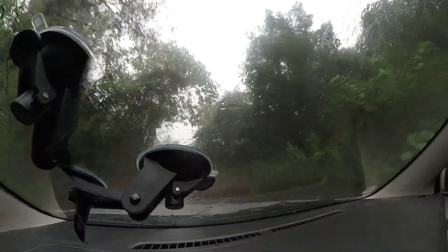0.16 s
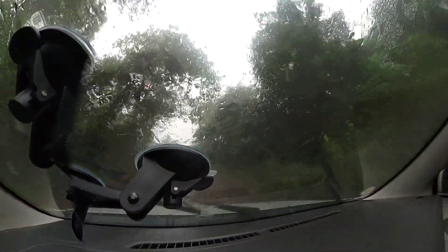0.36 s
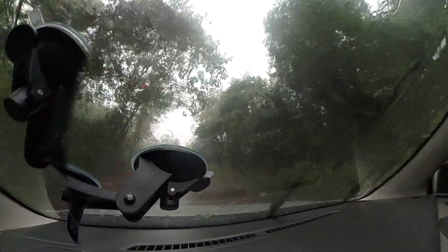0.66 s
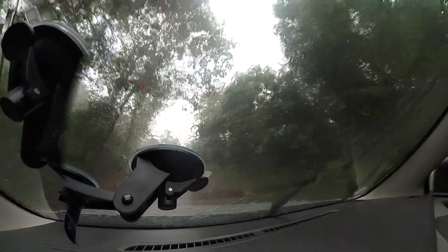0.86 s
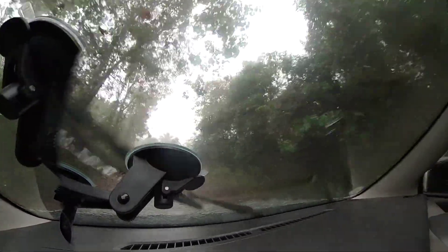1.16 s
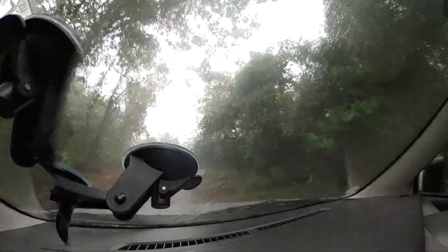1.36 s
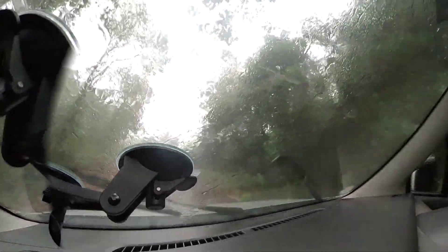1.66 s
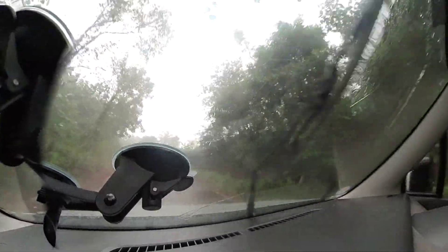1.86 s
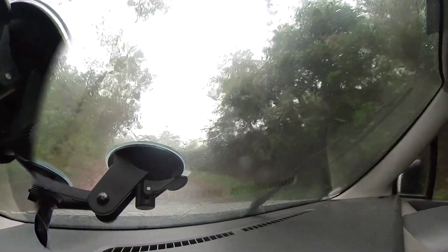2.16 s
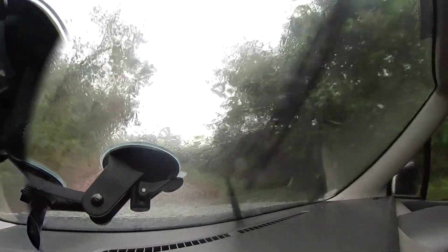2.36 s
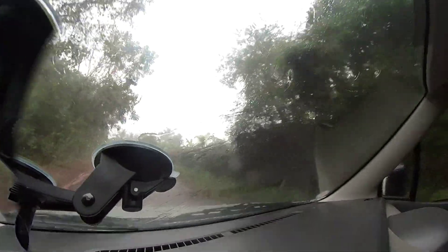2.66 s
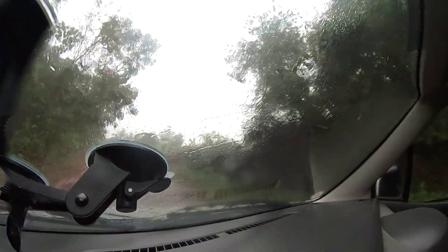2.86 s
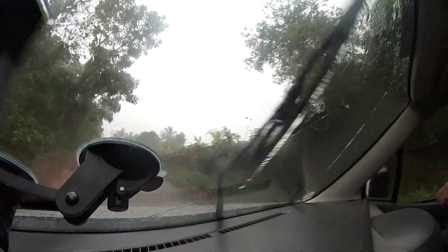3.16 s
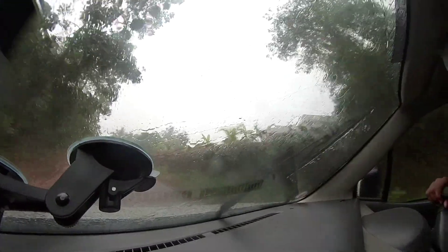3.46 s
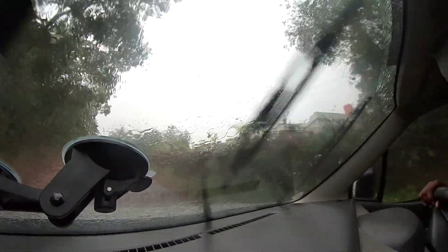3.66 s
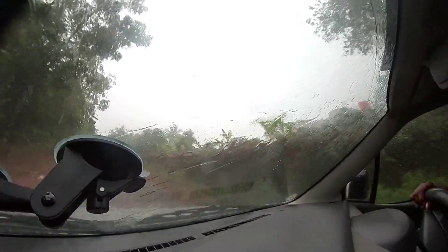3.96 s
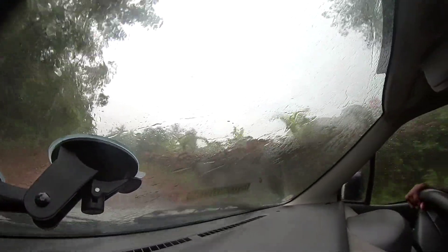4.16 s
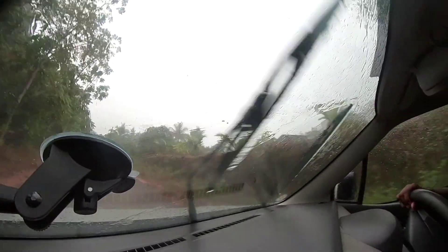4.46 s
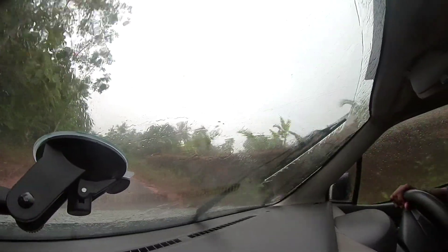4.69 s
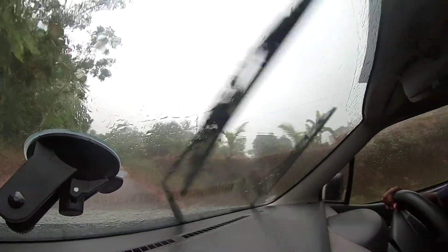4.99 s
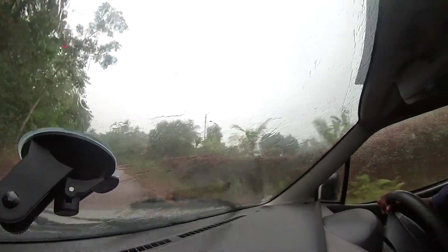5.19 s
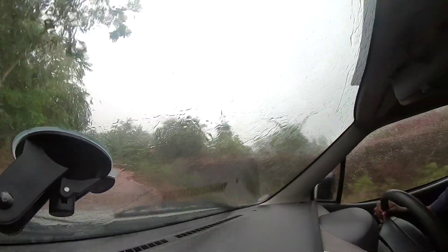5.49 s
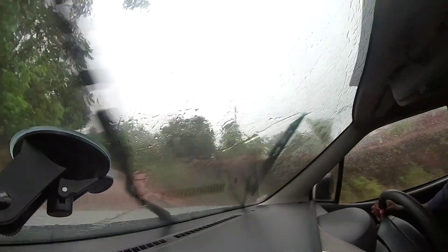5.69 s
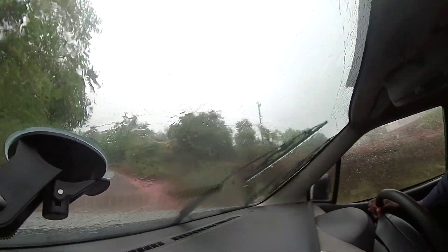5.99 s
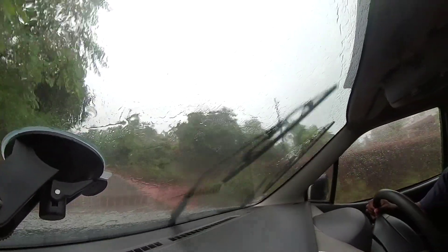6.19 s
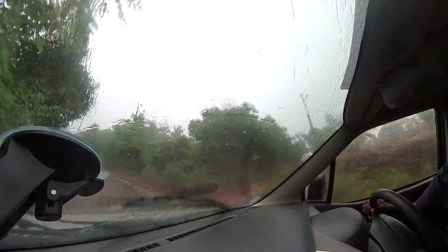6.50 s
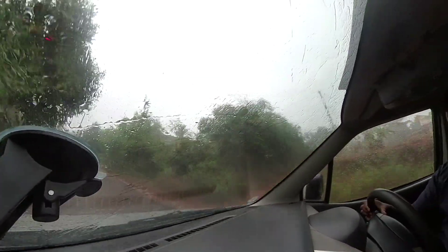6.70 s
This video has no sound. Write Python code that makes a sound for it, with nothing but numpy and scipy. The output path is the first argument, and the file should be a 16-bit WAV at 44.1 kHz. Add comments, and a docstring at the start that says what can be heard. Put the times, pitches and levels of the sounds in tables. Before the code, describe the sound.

Heavy rain drums on a moving car heard from the cabin, with wet road roar, a rising engine hum and late low thuds.

```python
"""Inside a small car that speeds up through heavy rain until the driver lifts off the throttle.
Rain is a dense patter of ringing ticks over a noise blur, with large drops as short bursts on the glass.
The wet road is lumpy low noise through the floor, and the engine a stack of firing tones in a booming cabin.
Bumps shake the shell with ringing noise and low thuds, and a peak limiter holds it all down."""
import sys
import numpy as np
from scipy import signal
from scipy.fft import rfft, irfft
from scipy.io import wavfile
from scipy.ndimage import uniform_filter1d, minimum_filter1d

SR = 44100
rng = np.random.default_rng(int(sys.argv[2]) if len(sys.argv) > 2 else 0)


def to_wav(sig):
    """Store sig (one row per channel, or 1-D mono) as 16-bit WAV at the path in sys.argv[1].

    Samples outside -1..1 are clipped; the rate is SR.
    """
    pcm = np.clip(np.atleast_2d(sig), -1, 1) * 32767
    pcm = np.round(pcm).astype(np.int16)
    wavfile.write(sys.argv[1], SR, pcm.T)  # frames by channels


N = 301644


def amp(db):
    """Amplitude factor of a level in dB."""
    return 10 ** (np.asarray(db) / 20)


def evened(x):
    """Scales a sound to an rms of 1."""
    return x / np.sqrt(np.mean(x ** 2) + 1e-20)


def curve(rows):
    """Columns of a table of times, joined by straight lines at every sample."""
    seconds, *columns = np.transpose(rows)
    return [np.interp(np.arange(N) / SR, seconds, column) for column in columns]


def swells(rows):
    """Sum in dB of smooth humps, each down to 1/e of its dB half a length from its middle."""
    t = np.arange(N) / SR
    return sum(db * np.exp(-8 * ((t - middle_s) / length_s) ** 2 / 2) for middle_s, db, length_s in rows)


def colour(x, points):
    """Filters a sound by a spectrum of (Hz, dB) points."""
    point_hz, db = np.transpose(points)
    hz = np.fft.rfftfreq(N, 1 / SR)
    gain_db = np.interp(np.log(hz + 1), np.log(point_hz + 1), db)
    return irfft(rfft(x) * amp(gain_db), N)


def wobble(hz):
    """Slow random drift: low-passed noise of rms 1, with rates up to about hz."""
    b, a = signal.butter(2, hz, fs=SR)
    return evened(signal.lfilter(b, a, rng.standard_normal(N)))


# Stereo width of rain, road and splats.
# Each row: frequency in Hz, left-right difference against the sum in dB.
STEREO_WIDTH = [(30, -0.5), (60, -8.5), (100, -20), (180, -19.5), (310, -14.5), (530, -22), (920, -17),
                (1600, -10), (2760, -7), (4760, -6.5), (6200, 1.5), (8230, -0.5)]


def spread(middle, other):
    """Two close microphone ports share a common part; an unrelated part has opposite sign in each."""
    side = colour(other, STEREO_WIDTH)
    return np.array([middle + side, middle - side])


def drops(per_s, spread_db, t60, tilt_db):
    """White patter: drops of uneven size, each a tick that dies away 60 dB in t60 seconds."""
    size_db = spread_db * np.minimum(rng.exponential(1, N), 3.5)
    hits = amp(size_db) * (rng.random(N) < per_s / SR)
    t = np.arange(2048) / SR
    out = np.zeros((2, N))
    patch = rng.integers(0, 12, N)
    octave = np.log2(np.fft.rfftfreq(len(t), 1 / SR) + 100)
    decay = amp(-60 * t / max(t60, .002))
    for k in range(12):  # each patch of roof favours its own bands and has its own path to each port
        favour = amp(tilt_db * np.cos(np.pi * octave + 2 * np.pi * k / 12))
        tails = irfft(rfft(rng.standard_normal((2, len(t)))) * favour) * decay
        out += signal.oaconvolve((hits * (patch == k))[None], tails, axes=1)[:, :N]
    return evened(out)


# Colour of the rain heard through roof and glass. Each row: frequency in Hz, relative level in dB per Hz.
RAIN_COLOUR = [(150, -46.5), (300, -17.5), (558, -18), (854, -13), (1150, -16.5), (1440, -18.5),
               (1630, -17), (1790, -21.5), (3060, -23.5), (4500, -28.5), (6050, -32.5), (6400, -43),
               (7300, -48), (8680, -65)]
# Course of rain and road. Each row: time in seconds, level of the rain hiss above 1200 Hz in dB,
# level of the road roar in dB.
RAIN_AND_ROAD = [(0.0, -23.5, -14.5), (0.4, -23.5, -11.5), (0.8, -24.5, -14), (1.25, -23.5, -13),
                 (1.55, -26.5, -12), (1.8, -26, -11), (2.05, -26.5, -13), (2.5, -23, -15), (3.0, -25, -12),
                 (3.3, -23.5, -15), (3.6, -25, -13.5), (3.95, -24.5, -14), (4.3, -26, -14.5),
                 (4.85, -26.5, -16.5), (5.4, -26.5, -15.5), (5.65, -24, -16), (6.0, -25.5, -15),
                 (6.4, -23.5, -13), (6.84, -23.5, -14.5)]
# Flurries of heavier rain on the glass. Each row: middle in seconds, rise in dB, length in seconds.
FLURRIES = [(0.81, 2.5, 0.099), (1.77, 8, 0.19), (2.0, 5, 0.15), (3.19, 3, 0.048), (3.52, 5.5, .05),
            (3.63, 2, 0.055), (3.77, 0, 0.041), (3.9, 2.5, 0.079), (5.26, 1, 0.043), (5.6, 1, .06),
            (5.96, 3, 0.058), (6.08, 2, 0.029), (6.29, 2, 0.07), (6.5, 2, 0.093), (6.67, 3, 0.07),
            (6.78, 2, .05)]
# Brief dips of the hiss, mostly as the wipers turn round.
# Each row: middle in seconds, change in dB (negative), length in seconds.
LULLS = [(0.29, -2.5, 0.069), (1.4, -1.5, 0.03), (2.11, -1, .06), (2.71, -2, 0.066), (3.27, -4, 0.08),
         (3.69, -3.5, 0.052), (3.82, -3, 0.051), (4.14, -4.5, 0.066), (5.5, -3, 0.081), (6.04, -1.5, 0.048),
         (6.58, -2.5, 0.054)]
FLICKER_DB = 0.72  # rms


def rain():
    """Near drops tick over the noise blur of far ones; gusts make the whole patter flicker."""
    blur = rng.standard_normal((2, N))
    near = amp(-4.0) * drops(per_s=800, spread_db=3.0, t60=0.022, tilt_db=3.5)
    hard_ticks = amp(-9.0) * drops(per_s=600, spread_db=3.0, t60=0.008, tilt_db=4.5)  # on the glass
    middle, other = (colour(w, RAIN_COLOUR) for w in blur + near + hard_ticks)
    hiss = signal.sosfilt(signal.butter(4, 1200, "high", fs=SR, output="sos"), middle)
    gusts_db = swells(FLURRIES) + swells(LULLS)
    level_db = curve(RAIN_AND_ROAD)[0] + gusts_db + FLICKER_DB * wobble(hz=24)
    return amp(level_db) * spread(middle, other) / np.std(hiss)


# Colour of the road roar. Each row: frequency in Hz, relative level in dB per Hz.
ROAD_COLOUR = [(20, -35), (40, -15), (60, -3), (100, 1.5), (180, 3.5), (300, -1), (450, -4), (560, -2.5),
               (610, -5.5), (750, -10.5), (860, -9.5), (1300, -24.5), (2500, -58.5)]


def road():
    """Tyres on wet tarmac roar through the floor: lumpy low noise."""
    middle, other = (colour(w, ROAD_COLOUR) for w in rng.standard_normal((2, N)))
    lumps_db = 0.63 * wobble(hz=4.9)
    spray_db = 0.4 * (swells(FLURRIES) + swells(LULLS))  # spray follows the rain
    level_db = curve(RAIN_AND_ROAD)[1] + lumps_db + spray_db
    return amp(level_db) * spread(middle, other) / np.std(middle)


# Climb of the engine. Each row: time in seconds, firing rate in Hz.
FIRING_RATE = [(0.0, 41.63), (0.9, 44.49), (1.8, 46.96), (2.7, 50.27), (3.6, 55.0), (4.5, 60.9),
               (5.1, 66.4), (5.8, 73.02), (6.1, 70.4)]
# How the cabin answers an engine tone. Each row: frequency in Hz, gain in dB.
CABIN_ANSWER = [(40, -15.5), (45, -28.5), (48.5, -13), (55, -16), (58.5, -9.5), (61, -1), (65, 0.1),
                (72, -4), (83, -7), (91, -2), (100, -3), (110, 0), (120, 1.5), (126, -4), (132.5, -12),
                (136.5, -5), (142, -7), (146, -8), (150, -10), (165, -9), (175, -2.5), (184, -10),
                (190, -3.5), (197, -1), (203, -8), (212, -7), (222, -4.5), (232, -10), (245, -15.5),
                (270, -9), (300, -16), (340, -18.5)]
# Firing orders 1 to 6. Each row: rms level in dB at the starting rate before the cabin and roughness,
# change in dB for each Hz that the rate climbs, rms roughness as a share of the tone.
FIRING_ORDERS = [(-10.5, 0.19, 0.15), (-12, 0.1, 0.13), (-8.5, -2, .12), (-14.5, -0.248, 0.2),
                 (-26, -0.1949, 0.97), (-16.5, -0.0225, 0.7)]
# The driver eases, then lifts off, and the tones die away.
# Each row: time in seconds, level of the tones in dB.
THROTTLE = [(5.7, 0), (5.77, -4.5), (5.86, -5.5), (5.96, -15), (6.3, -45)]
MOST_FADE_DB = -12.5  # the climbing rate fades no order further than this
ROUGH_HZ = 14.8  # how fast uneven firing shakes each tone


def engine():
    """Firing orders add to a slow rise and quick fall of pressure; each booms at cabin resonances."""
    rate_hz = curve(FIRING_RATE)[0]
    cabin_hz, cabin_db = np.transpose(CABIN_ANSWER)
    angle = 2 * np.pi * np.cumsum(rate_hz * (1 + 0.002 * wobble(hz=6.0))) / SR
    tone = np.zeros(N)
    for order, (start_db, db_per_hz, rough) in enumerate(FIRING_ORDERS, start=1):
        shake = (wobble(hz=ROUGH_HZ) + 1j * wobble(hz=ROUGH_HZ)) / np.sqrt(2)
        uneven = 1 + rough * shake  # shakes both level and phase
        climb_db = np.maximum(db_per_hz * (rate_hz - rate_hz[0]), MOST_FADE_DB)
        boom_db = np.interp(order * rate_hz, cabin_hz, cabin_db)
        level = amp(start_db + climb_db + boom_db)
        tone += level * (uneven * np.exp(1j * order * angle)).imag
    return -np.sqrt(2) * tone * amp(curve(THROTTLE)[0])  # root 2 turns rms into peak


# Low modes of the car shell.
# Each row: frequency in Hz, width of one filter pass in Hz (at least 30 is used), relative level in dB.
SHELL_MODES = [(55, 22, -4), (96, 25, -4.5), (128, 61, -1), (175, 58, -1.5), (228, 76, -5.5)]
# Bumps under the wheels, each a low thud.
# Each row: middle in seconds, peak in dB, pitch in Hz, length between the 1/e points in seconds.
THUDS = [(2.95, -12, 121.2, 0.14), (2.97, -18, 163, .08), (5.8, -16.5, 153.1, 0.046),
         (5.86, -10, 102.4, .05), (5.9, -11, 183.5, 0.096), (5.912, -7.5, 117, 0.07),
         (5.99, -8, 107.4, 0.04), (6.065, -6, 119.5, 0.055), (6.16, -11, 159.7, 0.047),
         (6.262, -11.5, 55, 0.12), (6.333, -10, 123, 0.055), (6.335, -13.5, 221.2, .06),
         (6.212, -12, 178.6, .06), (6.403, -16.5, 95, .07), (6.46, -15.5, 208, 0.06),
         (6.52, -12, 126, 0.07), (6.56, -12, 176, 0.07), (6.597, -15, 55, 0.14), (6.72, -10.5, 131, 0.078)]
ROUGH_FROM_S, ROUGH_DB, SMOOTH_DB = 5.78, -15, -32.5  # the ground turns rough around this time


def bumps():
    """Rough ground shakes the low modes of the shell; single bumps thud through it."""
    jolts, out, t = rng.standard_normal(N), np.zeros(N), np.arange(N) / SR
    for k, (hz, width_hz, db) in enumerate(SHELL_MODES):
        b, a = signal.iirpeak(hz, hz / max(width_hz, 30), fs=SR)
        ringing = signal.lfilter(b, a, signal.lfilter(b, a, jolts))
        out += (-1) ** k * amp(db) * evened(ringing)  # neighbouring modes have opposite sign
    ground_db = np.interp(t, [ROUGH_FROM_S - .1, ROUGH_FROM_S + 0.11], [SMOOTH_DB, ROUGH_DB])
    out = evened(out) * amp(ground_db)
    for (middle_s, db, hz, length_s), turn in zip(THUDS, rng.random(len(THUDS))):
        swell = np.exp(-8 * ((t - middle_s) / length_s) ** 2 / 2)
        out += amp(db) * swell * np.sin(2 * np.pi * (hz * t + turn))
    return out


# Large drops that stand out of the patter.
# Each row: start in seconds, starting level of the white burst in dB before the glass colours it.
LARGE_DROPS = [(0.144, -13), (0.3192, -17), (0.4354, -23), (0.4768, -12.5), (0.615, -10), (0.8824, -19),
               (1.185, -15), (1.34, -9), (1.431, -12), (1.5918, -12), (1.724, -13), (1.747, -13),
               (1.795, -9), (1.882, -17.5), (1.957, -13), (2.21, -11), (2.336, -19), (2.9665, -23),
               (3.313, -14.5), (3.546, -17.5), (3.6202, -17), (3.6987, -10), (3.768, -9), (4.2826, -18),
               (4.4104, -19.5), (4.4393, -17), (4.464, -19.5), (4.6019, -15), (5.0265, -24.5), (5.252, -16),
               (6.153, -12), (6.396, -7), (6.536, -9), (6.7712, -14)]
# Colour of a splat on the glass. Each row: frequency in Hz, gain in dB.
GLASS_COLOUR = [(300, -12.5), (560, 5.5), (700, 0.5), (870, 4.5), (1300, 0), (3000, -3), (6000, -12.5),
                (6500, -22.5), (8800, -45)]


def splats():
    """Each large drop is a short burst of noise on the glass that falls 60 dB in 50 ms."""
    t, white = np.arange(1500) / SR, np.zeros((2, N + 1500))
    for start_s, db in LARGE_DROPS:
        burst = rng.standard_normal((2, len(t))) * amp(db - 60 * t / 0.05)
        start = round(start_s * SR)
        white[:, start:start + len(t)] += burst
    return spread(*(colour(w, GLASS_COLOUR) for w in white[:, :N]))


# Roof and door panels that ring along. Each row: frequency in Hz, width in Hz, lift in dB.
PANEL_BANDS = [(342, 18, 1.5), (569, 19, 2.5), (710, 18, 1.5), (860, 46, 1.5), (1083, 16, 4), (1255, 46, 2)]


def panels(x):
    """Thin panels lift a few narrow bands of all that passes through them."""
    hz = np.fft.rfftfreq(N, 1 / SR)
    lift_db = sum(db / (1 + (2 * (hz - f) / width) ** 2) for f, width, db in PANEL_BANDS)
    return irfft(rfft(x) * amp(lift_db), N)


def scene():
    """Rain, splats and road pass through the panels; bumps and engine join them directly."""
    return panels(rain() + splats() + road()) + bumps() + engine()


THRESHOLD_DB, EDGE_HZ = -.9, 8834  # where limiting starts, upper band limit


def record(dry):
    """A peak limiter turns down 89 % of the excess dB and recovers steadily; then the band limit."""
    peak_db = 20 * np.log10(abs(dry).max(0) + 1e-9)
    fall_db = np.arange(N) * 60.0 / SR  # the held peak falls 60 dB a second
    held_peak_db = np.maximum.accumulate(peak_db + fall_db) - fall_db
    over_db = np.maximum(held_peak_db - THRESHOLD_DB, 0)
    ahead_db = -minimum_filter1d(-over_db, size=177)  # looks two milliseconds ahead
    held = dry / amp(0.89 * uniform_filter1d(ahead_db, size=177))
    band_limit = signal.firwin(511, EDGE_HZ, window=("kaiser", 9), fs=SR)
    return signal.oaconvolve(held, band_limit[None], "same")


dry = scene()
out = record(dry)
to_wav(out)
```